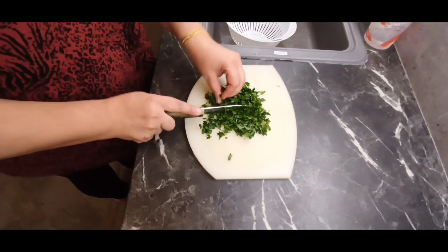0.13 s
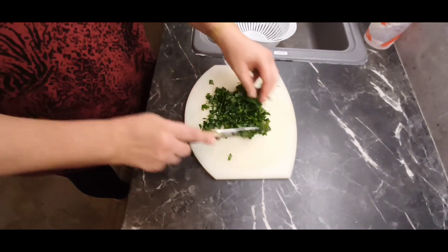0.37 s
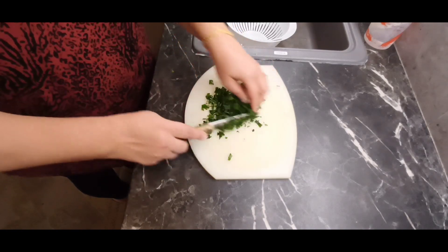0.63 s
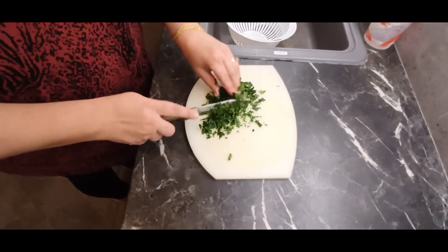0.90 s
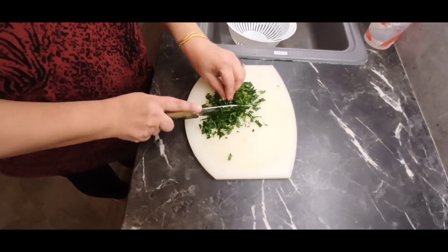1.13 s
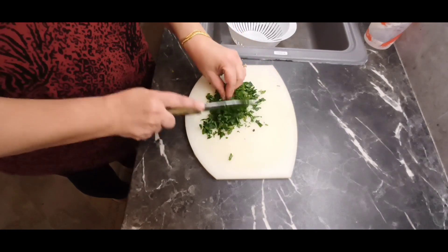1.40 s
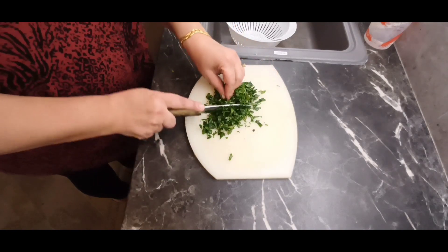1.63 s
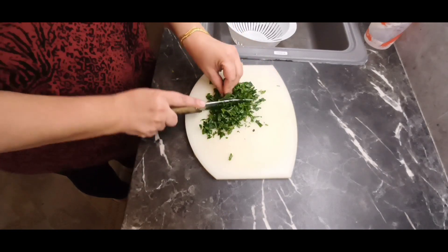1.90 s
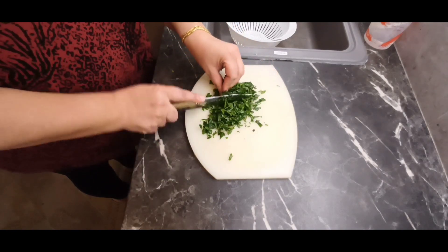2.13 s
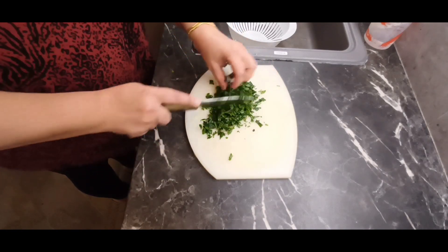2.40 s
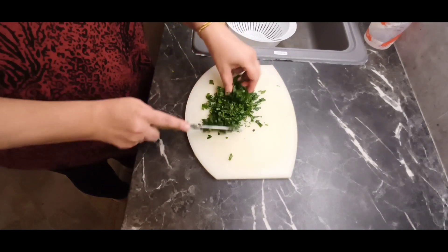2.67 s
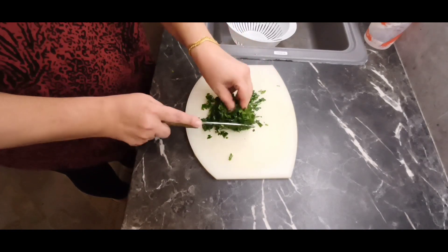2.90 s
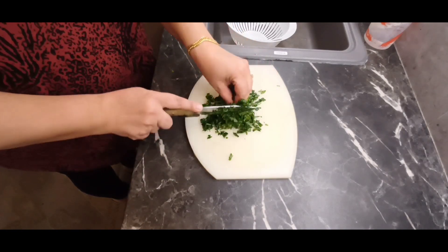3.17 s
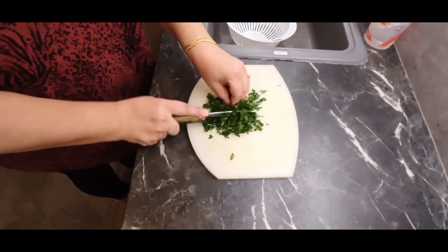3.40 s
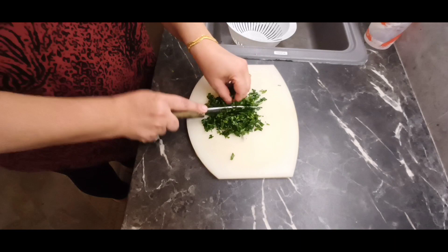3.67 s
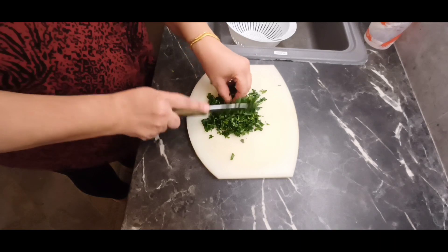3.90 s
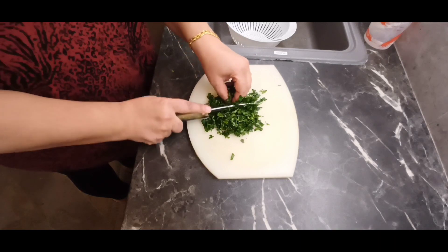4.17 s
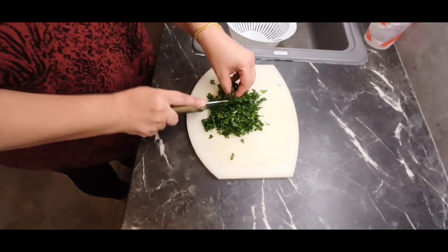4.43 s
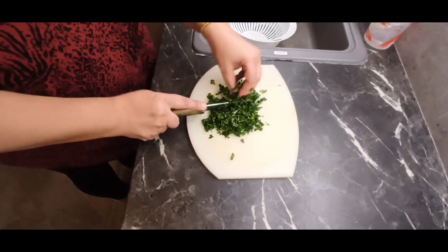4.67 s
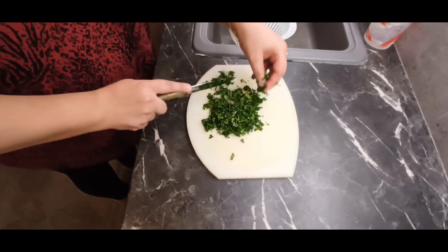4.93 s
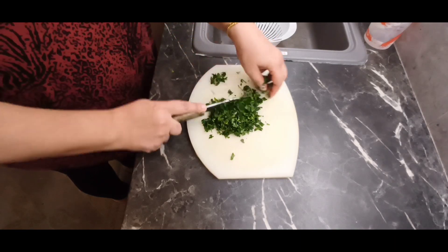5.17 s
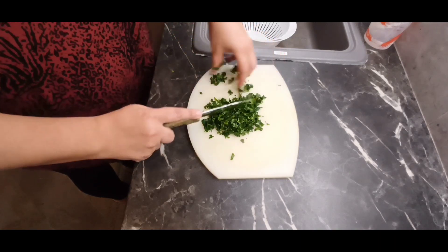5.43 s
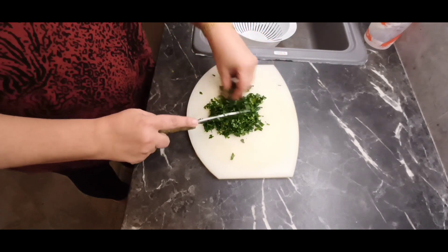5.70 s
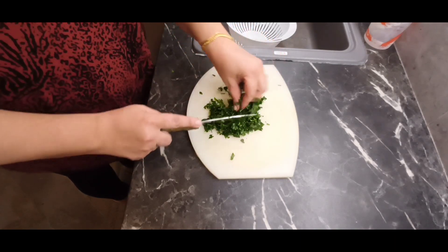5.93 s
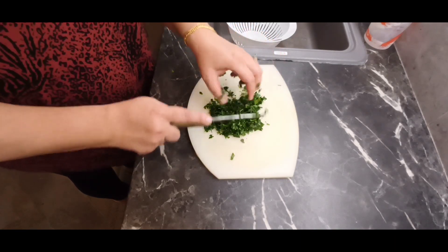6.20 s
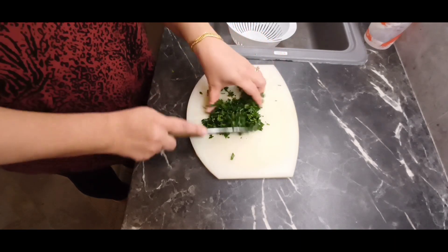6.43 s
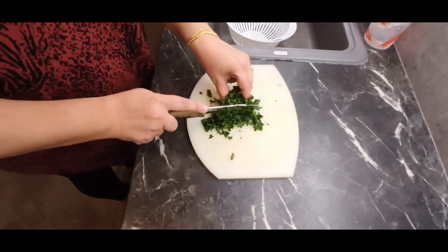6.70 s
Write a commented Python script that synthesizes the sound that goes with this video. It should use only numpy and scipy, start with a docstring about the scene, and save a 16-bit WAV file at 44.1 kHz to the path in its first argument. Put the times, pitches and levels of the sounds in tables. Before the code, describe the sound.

A kitchen knife chops fresh herbs on a plastic board in uneven crisp crunches and knocks, with soft leafy rustling between, in a small kitchen.

```python
"""First, over a low room hum, leaves rustle faintly, a stem snaps and a knife knocks a plastic board.
The chopping goes on: leaves crackle as clouds of tiny clicks and stems snap as sudden sprays of them.
Knocks, soft scuffs and crushed leaves push on the board, whose damped resonances ring.
The blade slides through leaves and scrapes sideways, ringing the steel; small rasps ring it too.
Tiles and stone add a short echo of fading noise. Two phone microphones listen close by."""
import sys
import numpy as np
from scipy import signal
from scipy.fft import rfft, irfft
from scipy.io import wavfile
from scipy.ndimage import uniform_filter1d

SR = 44100
rng = np.random.default_rng(int(sys.argv[2]) if len(sys.argv) > 2 else 0)


def amplitude_ratio(level_db):
    """Convert a level in decibels to the matching linear amplitude (field) ratio."""
    exponent = np.asarray(level_db, float) / 20
    return 10 ** exponent


def store_wav(level_fs):
    """Save 16-bit WAV to argv[1]."""
    pcm = np.round(np.clip(np.atleast_2d(level_fs), -1, 1) * 32767)
    wavfile.write(sys.argv[1], SR, pcm.T.astype(np.int16))


N = 300762
TIME = np.arange(N) / SR

# blade hitting the board: t/s, force/dB, weight into the counter/dB,
# landing/dB (negative towards the middle, positive towards the edge), contact/ms
KNOCKS = [(0.0746, -39.5, -2.5, -7.5, 20.6), (0.0974, -55, 0, -8, 2.9), (0.4538, -33.5, -3, -0.5, 4),
          (0.572, -54.5, -6, 2, 9.3), (1.2484, -41, -11.5, -1.5, 17.5), (1.2744, -43, -8.5, 18, 9.1),
          (1.5601, -34.5, -6, 3, 8.2), (1.5928, -33, -12, -5, 5.8), (1.8757, -35, -12, -15, 6),
          (1.9288, -41.5, -2.5, -1.5, 3.8), (2.2007, -23, -25.5, -2, 3.6), (2.2191, -40, -37, -0.5, 18),
          (2.2545, -34, -35.5, 22, 8.1), (3.3728, -37.5, -2, -2.5, 6.4), (3.3876, -28, -8, 0.5, 2.7),
          (3.4624, -44.5, -9.5, 9, 10), (3.7484, -42.5, -8, -12.5, 8.8), (3.7852, -39, -23, -23, 12),
          (3.8074, -39, -7.5, -4, 4.7), (3.8474, -42, -5, -3, 6), (4.121, -51, -14, -15, 11),
          (4.1605, -36, -16.5, 5, 12), (4.2492, -58.5, -3.5, 21, 8.8), (4.5305, -40.5, -11, -16, 2.9),
          (4.5693, -43.5, 2.5, -24, 7), (5.036, -32.5, -13.5, -3, 1.9), (5.0561, -38.5, -8, -28, 6.1),
          (5.1033, -38.5, -6, 0, 3.7)]
# soft brushes of fingers and blade on the board: same columns as KNOCKS
SCUFFS = [(0.2783, -60.5, -7.5, 5, 18), (0.6507, -59, -6.5, 6.5, 29), (0.9544, -61, -13.5, 6, 34),
          (1.525, -80, 13, 0, 20), (1.81, -78, 10.5, -7, 40), (2.135, -76, 14, -12, 33),
          (2.4105, -57, -13, -2, 19), (2.519, -61.5, -16, -16, 24), (2.653, -59, 2, 1.5, 9.2),
          (2.712, -63, -5, 1, 25), (2.7664, -62, -14, 6, 35), (2.8354, -66.5, -4, 4, 14.6),
          (3.7, -70, 9, -2, 27), (4.0104, -61, -11, 6, 25), (4.315, -67.5, -16.5, 19, 14),
          (4.4464, -56.5, -5, -5.5, 25), (4.497, -50.5, -12, 1, 10.5), (4.6854, -56.5, -13, 3, 9),
          (4.8794, -64, -16, 5.5, 18.6), (5.245, -82.5, 14, 0, 13), (5.333, -65.5, -10.5, 13.5, 29),
          (5.385, -56, -15.5, 1.5, 25.4), (5.5127, -69.5, 3, -6.5, 15), (5.593, -65, -12, 7.5, 17),
          (5.62, -62, -9, 13.5, 35), (5.761, -51, -28, 15, 9.5), (5.78, -61.5, -7.5, 11, 20),
          (5.959, -65, -8, 13.5, 24), (5.99, -76.5, -1, 11.5, 13), (6.2468, -60.5, -6.5, 0, 25.4),
          (6.4069, -64.5, -2, -1, 31), (6.5528, -80, 3, 3.5, 12.5), (6.7027, -60.5, -6, -0.5, 23)]
# the edge bottoming out in the heap:
# t/s, crackle level/dB, body level against the crackle/dB, push on the board/dB
CUTS = [(0.088, -60.5, -2.5, -54.5), (0.483, -72.5, -1, -41), (1.265, -51, -4, -45.5),
        (1.57, -49, -3, -39.5), (1.879, -55, -1, -43.5), (1.93, -64.5, 2, -93), (2.21, -53, 0.5, -34),
        (2.242, -68, 1, -47), (3.378, -48.5, -46.5, -36.5), (3.42, -60.5, 8, -64),
        (3.772, -51.5, -4, -44.5), (3.83, -54.5, 1, -66), (4.14, -56, -3, -46), (4.18, -56.5, -2, -54.5),
        (4.25, -67, 1, -88), (4.54, -55.5, 1, -45), (5.065, -88, 13.5, -41), (5.115, -51, -4.5, -48.5)]
# stems breaking: t/s, level/dB, body level against that level/dB
SNAPS = [(0.0721, -49.5, -15), (0.2104, -68, -12), (0.4539, -68, 9), (0.574, -60, 0.5),
         (1.2451, -52.5, -25), (1.254, -47.5, -36), (1.521, -67.5, -26), (1.5418, -58.5, -62),
         (1.5595, -37, -25.5), (1.6367, -59.5, -25), (1.8448, -53.5, -32), (1.8721, -43.5, -22),
         (1.9174, -44, -2), (1.9343, -57.5, -22), (2.133, -69, -18.5), (2.157, -59, -11.5),
         (2.1973, -39.5, -15.5), (2.8462, -50.5, -27.5), (3.1178, -69.5, -22), (3.37, -37.5, -34),
         (3.3894, -47.5, -33.5), (3.458, -49.5, -9), (3.69, -57.5, -31), (3.7463, -49.5, -19),
         (3.8073, -38, -2.5), (3.8294, -57, -8), (3.8687, -53.5, -6), (4.079, -65, -17), (4.122, -64.5, -3),
         (4.1607, -43, 0.5), (4.2485, -48, -5), (4.276, -56.5, -22), (4.4655, -74.5, -20), (4.53, -47, -11),
         (4.559, -52.5, -27), (4.666, -62, 3.5), (4.734, -66, -27), (5.034, -61.5, -38),
         (5.686, -74.5, -30)]
# fingers and blade stirring the heap:
# t/s, crackle level/dB, body level against the crackle/dB, swell/ms, fade/ms
RUSTLES = [(0.01, -79, -5, 30, 18), (0.21, -79, -18, 35, 45), (0.64, -71, -17, 58, 85),
           (1.06, -74.5, -32, 69, 83), (1.47, -82.5, -50, 61, 66), (1.68, -78.5, -12, 42, 220),
           (2.16, -68.5, -16, 30, 43), (2.79, -64.5, -19.5, 61.5, 41), (2.86, -65.5, -51, 34, 52),
           (3.11, -76, -19, 94, 31), (3.32, -67.5, -28, 60, 52), (3.55, -78.5, -41, 58, 52),
           (3.705, -62.5, -17, 16, 63), (4.11, -71, -28, 40, 46), (4.33, -78.5, -30, 29, 40),
           (4.49, -67.5, -10, 26, 18), (4.72, -74, -9, 43, 53), (5.29, -82.5, -12, 65, 27),
           (5.61, -81, -10, 17.6, 55), (5.705, -73.5, -18, 18, 56), (5.88, -84, -10, 50, 80),
           (6.51, -70, -20, 43, 57), (6.78, -86.5, -10, 71, 40)]
# flat of the blade sliding through leaves on the board: t/s, level/dB, swell/ms, fade/ms
SLIDES = [(0.6, -62.5, 60, 29), (2.44, -73, 67, 26), (5.5, -74, 36, 72), (5.68, -75, 50, 59),
          (5.8, -64.5, 21, 31), (6.015, -75, 17, 17), (6.5, -83, 93, 67)]
# blade scraping sideways: t/s, level/dB
SCRAPE = [(5.097, -61.5), (5.123, -37.5), (5.198, -72.5), (5.213, -64.5), (5.26, -82.5)]
# faint metallic rasps: t/s, level/dB, f/Hz, length/ms
TINKS = [(0.575, -79, 3800, 37), (4.011, -82, 3860, 42)]
# resonances of the board on the stone counter: f/Hz, width/Hz, relative level/dB
BOARD_MODES = [(84, 18, -3.5), (111.4, 8.3, -7.5), (157.4, 27, -7.5), (255, 42, -6.5), (320.5, 57, -6),
               (354, 37, -1), (414, 29, 0), (501.3, 29, -1.5), (583.4, 48, 1.5), (651.6, 58, 2),
               (743, 27, 1), (841, 30, -7.5), (979, 58, -2.5), (1080, 84, -6.5), (1283, 180, -10.5),
               (1454, 32, -10.5), (1627, 160, -27), (1770, 57, -11.5), (2038, 99, -20), (2250, 68, -19),
               (2790, 1300, -22)]
# edges between the board's four families of resonances: f/Hz
FAMILY_EDGES = [0, 290, 540, 930, 4000]
# how well each family sends out sound: level/dB
RADIATION_DB = [8.5, 1.5, 1, -7]
# resonances of the blade while it scrapes: f/Hz, width/Hz, relative level/dB
BLADE_MODES = [(946, 67, 1.5), (1468, 87, -0.5), (2040, 130, -11), (2610, 280, -15), (3270, 130, -5.5),
               (3784, 93, -6), (4900, 2000, -24.5), (11200, 210, -7), (13450, 300, -13)]
# tone of crackling leaves: f/Hz, relative level per Hz/dB
CRACKLE_TONE = [(880, -30.5), (1500, -1), (2080, -2.5), (2510, -6), (4970, -6.5), (6310, -9), (7540, -7),
                (9190, -6), (12900, -3), (16000, -5.5)]
# tone of the room hum: f/Hz, relative level per Hz/dB
HUM_TONE = [(24, -35), (40, 1), (91, 4.5), (167, -8), (204, -12), (363, -10.5), (503, -9), (630, -14.5),
            (733, -13.5), (896, -27), (1550, -25.5), (6490, -35), (12800, -30.5), (16000, -29)]
# echo of the kitchen, one row per band: f/Hz, time to fade by 60 dB/s, tail level/dB,
# counter and sink level/dB (both before the band filter), likeness of left and right/0-1
KITCHEN = [(102, 0.51, -9.5, -7, 0.5), (375.4, 0.21, -4, -26.5, 0.82), (1000, 0.3, -3, -2, 0.11),
           (2500, 0.24, -1.5, 6.5, 0.1), (5600, 0.31, -3, 4.5, .05), (12640, 0.21, -19.5, 3, .05)]

# each part of a cut builds up and dies away: time constants (rise ms, fall ms)
CUT_CRACKLE_MS, CUT_BODY_MS, CUT_PUSH_MS = (14, 36.6), (8.8, 35.4), (10.5, 33.9)
SNAP_MS, SNAP_RISE_MS, SNAP_BODY_RISE_MS = 5.34, .17, .99
# the heap is never quite still: its faintest crackle and rub on the board
REST_CRACKLE_DB, REST_PUSH_DB = -97, -80.5
STIFFENING = 0.22  # extra dB of clack for each dB of force above the average
PLACES = 3  # spots in the heap that crackle separately
HUM_DB = -68.5
LEFT_OVER_RIGHT_DB = -2.5  # the knife work, left against right
RIGHT_LEAD = 7  # samples by which direct sound reaches the right first


def board():
    """Knocks, softer scuffs and the push of crushed leaves; too small a board for deep bass."""
    cut_s, _, _, push_db = np.transpose(CUTS)
    push_level = swells(cut_s, push_db, *CUT_PUSH_MS, order=1) + amplitude_ratio(REST_PUSH_DB)
    push = push_level * grit(rate=6000, scatter_db=2)
    push = signal.sosfilt(signal.butter(2, 1400, fs=SR, output="sos"), push)
    knocks = blows(KNOCKS, cut_hz=2120, strike_db=20.5, clack_db=4.5, clack_db_per_ms=-0.44)
    scuffs = blows(SCUFFS, cut_hz=1650, strike_db=0.5, clack_db=5, clack_db_per_ms=-0.41)
    return band(knocks + scuffs + ring(push, BOARD_MODES), 68, 8300)


def blows(table, cut_hz, strike_db, clack_db, clack_db_per_ms):
    """One clean strike, then a short rattle of contacts, ring the four families of resonances."""
    s, force_db, weight_db, landing_db, ms = np.transpose(table)
    # plastic and skin give way, so the force holds little treble
    yielding = signal.butter(5, cut_hz, fs=SR, output="sos")
    rattle = grit(rate=8000, scatter_db=-0.5)
    rise_ms = ms ** 2 / 90  # soft contacts last longer and set in more slowly
    middle_db = -np.maximum(landing_db, 0)  # landing near the edge weakens the knock
    edge_db = np.minimum(landing_db, 0)  # landing near the middle weakens the woody ring
    short_db = clack_db + clack_db_per_ms * ms  # short contacts clack more
    short_db = short_db + STIFFENING * (force_db - force_db.mean())  # so do harder blows
    # lowest family first: thump of the counter, knock, woody ring, clack
    shares_db = [weight_db, middle_db, edge_db, short_db]
    out = 0
    for lo, hi, share_db, out_db in zip(FAMILY_EDGES, FAMILY_EDGES[1:], shares_db, RADIATION_DB):
        force = rattle * bursts(s, force_db + share_db, ms, rise_ms)
        force[(s * SR).astype(int)] += amplitude_ratio(force_db + share_db + strike_db)
        force = signal.sosfilt(yielding, force)
        family = [mode for mode in BOARD_MODES if lo <= mode[0] < hi]
        out = out + amplitude_ratio(out_db) * ring(force, family)
    return out


def leaves():
    """Cells bursting at several places: a swelling crackle, a sudden spray at each broken stem."""
    cut_s, cut_db, cut_body_db, _ = np.transpose(CUTS)
    stir_s, stir_db, stir_body_db, swell_ms, fade_ms = np.transpose(RUSTLES)
    snap_s, snap_db, snap_body_db = np.transpose(SNAPS)
    grains = np.array([grit(rate=3500, scatter_db=1.9) for _ in range(PLACES)])
    grains = colour(grains, CRACKLE_TONE)
    bright = unit(band(grains, 4800, 16000))
    dull = unit(band(grains, 1700, 6800))
    flicker = amplitude_ratio(1.2 * walk(60))

    # loudness of the bright crackle
    top = swells(cut_s, cut_db, *CUT_CRACKLE_MS, order=1)
    top = top + swells(stir_s, stir_db, swell_ms, fade_ms, order=2)
    top = flicker * (top + amplitude_ratio(REST_CRACKLE_DB))
    top = top + bursts(snap_s, snap_db, SNAP_MS, SNAP_RISE_MS)

    # loudness of the duller body beneath it
    body = swells(cut_s, cut_db + cut_body_db, *CUT_BODY_MS, order=1)
    body = body + swells(stir_s, stir_db + stir_body_db, swell_ms, fade_ms, order=2)
    body = flicker * body + bursts(snap_s, snap_db + snap_body_db, SNAP_MS, SNAP_BODY_RISE_MS)
    return (top * bright + body * dull) / np.sqrt(PLACES)


def slides():
    """Light smooth friction that wakes only the board's upper resonances."""
    s, db, swell_ms, fade_ms = np.transpose(SLIDES)
    rub = swells(s, db, swell_ms, fade_ms, order=2) * grit(rate=9000, scatter_db=4.5)
    upper_modes = [mode for mode in BOARD_MODES if mode[0] >= FAMILY_EDGES[3]]
    return ring(band(rub, 900, 1670), upper_modes)


def blade():
    """The edge judders sideways over the board and the steel rings; faint rasps ring one pitch each."""
    at, db = np.transpose(SCRAPE)
    drag = amplitude_ratio(np.interp(TIME, at, db, left=-200, right=-200))  # as good as silent outside the scrape
    out = ring(drag * grit(rate=3100, scatter_db=0), BLADE_MODES)
    for s, db, hz, ms in TINKS:
        touch = bursts([s], [db], [ms], rise_ms=1.3) * grit(rate=3400, scatter_db=5.5)
        mode = [(hz, 330, 0)]
        out = out + ring(ring(touch, mode), mode)  # ringing twice narrows the pitch
    return out


def heard(x):
    """Direct sound, a few samples earlier on the right, and the echo of its own place."""
    late = np.concatenate([np.zeros(RIGHT_LEAD), x])[:N]
    return np.array([late, x]) + kitchen(x)


def kitchen(x):
    """Echo of fading noise, band by band: close surfaces die fast, the room's tail more slowly."""
    t = np.arange(SR // 2) / SR
    hz = [row[0] for row in KITCHEN]
    edges = [40, *np.sqrt(np.multiply(hz[1:], hz[:-1])), 20000]
    near = np.exp(-t / 0.0058)
    near = near / np.linalg.norm(near)
    echo = 0
    for k, (_, t60, tail_db, near_db, likeness) in enumerate(KITCHEN):
        shared, opposed = band(rng.standard_normal((2, len(t))), edges[k], edges[k + 1])
        # the more alike the two sides, the less opposed noise
        same = np.sqrt(1 + likeness) * shared
        apart = np.sqrt(1 - likeness) * np.array([[1], [-1]]) * opposed
        tail = (1 - np.exp(-t * 200)) * 1000 ** (-t / t60)
        fade = amplitude_ratio(tail_db) * tail / np.linalg.norm(tail) + amplitude_ratio(near_db) * near
        echo = echo + (same + apart) * fade / np.sqrt(2)
    return signal.fftconvolve(x[None], echo, axes=1)[:, :N]


def hum():
    """Low room noise whose bass wavers; the treble is smooth and unrelated left and right."""
    shared, opposed = colour(rng.standard_normal((2, N)), HUM_TONE)
    bass = signal.butter(2, 300, fs=SR, output="sos")
    # less opposed bass makes the two sides more alike there
    opposed = opposed - 0.76 * signal.sosfilt(bass, opposed)
    waver = amplitude_ratio(2.2 * walk(18))
    shared = shared + (waver - 1) * signal.sosfilt(bass, shared)
    return amplitude_ratio(HUM_DB) * unit(shared + opposed * np.array([[1], [-1]]))


def ring(force, modes):
    """Damped resonances with alternating signs, scaled so that white noise of rms 1 gives rms 1."""
    def through(x):
        out = 0
        for k, (hz, width, db) in enumerate(modes):
            r = np.exp(-np.pi * width / SR)  # wider resonances die away sooner
            w = 2 * np.pi * hz / SR
            tone = signal.lfilter([0, np.sin(w)], [1, -2 * r * np.cos(w), r * r], x)
            out = out + (-1) ** k * amplitude_ratio(db) * (1 - r) * tone
        return out
    click = signal.unit_impulse(SR // 2)
    return through(force) / np.sqrt(np.sum(through(click) ** 2))


def grit(rate, scatter_db):
    """Dense tiny clicks of uneven size, about rate per second, scaled to rms 1."""
    hit = rng.random(N) < rate / SR
    clicks = hit * rng.standard_normal(N)
    size = amplitude_ratio(scatter_db * rng.exponential(size=N))
    return unit(clicks * size)


def bursts(times, db, ms, rise_ms):
    """Loudness of contacts that build up over rise_ms and die away over ms (time constants)."""
    env = np.zeros(N + SR)
    t = np.arange(SR // 4) / SR * 1000
    for s, gain, fall, rise in np.broadcast(times, amplitude_ratio(db), ms, rise_ms):
        i = int(s * SR)
        env[i:i + len(t)] += gain * (1 - np.exp(-t / rise)) * np.exp(-t / fall)
    return env[:N]


def swells(times, db, rise_ms, fall_ms, order):
    """Sum of humps, pointed (order 1) or rounded (order 2), each with its own rise and fall."""
    t = np.arange(0, N / SR + .002, .001)[:, None]  # one step per millisecond
    ms = (t - times) * 1000
    slope = np.abs(ms) / np.where(ms < 0, rise_ms, fall_ms)
    humps = amplitude_ratio(db) * np.exp(-slope ** order / order)
    return np.interp(TIME, t[:, 0], np.sum(humps, axis=1))


def walk(rate):
    """Random levels, rate new ones a second, smoothed twice into a gentle wander."""
    k = int(SR / rate)
    steps = np.repeat(rng.standard_normal(N // k + 1), k)
    return 1.9 * uniform_filter1d(uniform_filter1d(steps, k), k)[:N]


def band(x, lo_hz, hi_hz):
    """Keep mainly what lies between two frequencies."""
    return signal.sosfilt(signal.butter(2, [lo_hz, hi_hz], "band", fs=SR, output="sos"), x)


def colour(x, points):
    """Shape the tone of a long noise by (Hz, dB) points."""
    hz, db = np.transpose(points)
    f = np.maximum(np.fft.rfftfreq(x.shape[-1], 1 / SR), 1)
    gain = amplitude_ratio(np.interp(np.log(f), np.log(hz), db))
    return irfft(rfft(x) * gain, x.shape[-1])


def unit(x):
    """Scale to rms 1."""
    return x / np.sqrt(np.mean(x ** 2))


def scene():
    """The knife work, nearer the right microphone, over the hum."""
    work = heard(board() + slides()) + heard(blade()) + sum(heard(place) for place in leaves())
    sides = amplitude_ratio(np.array([[LEFT_OVER_RIGHT_DB], [-LEFT_OVER_RIGHT_DB]]) / 2)
    hum_sides = amplitude_ratio(np.array([[-.7], [.7]]))
    return sides * work + hum_sides * hum()


def top_cut(x):
    """Nothing passes above the cut-off."""
    return signal.sosfilt(signal.butter(12, 16180, fs=SR, output="sos"), x)


def record(dry):
    """The phone cuts the deep bass before the mix is finished."""
    mix = signal.sosfilt(signal.butter(3, 48, "high", fs=SR, output="sos"), dry)
    return top_cut(mix)


dry = scene()
out = record(dry)
store_wav(out)
```